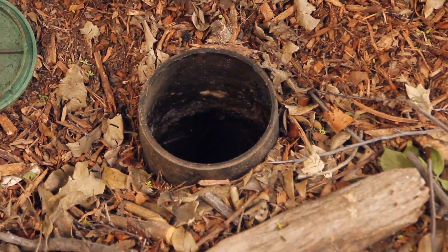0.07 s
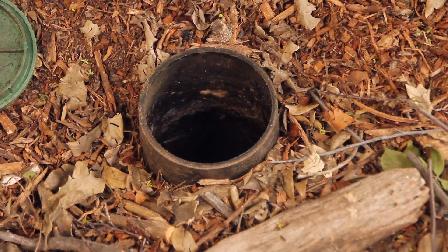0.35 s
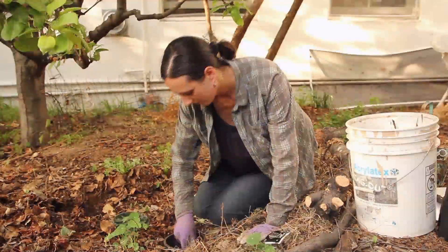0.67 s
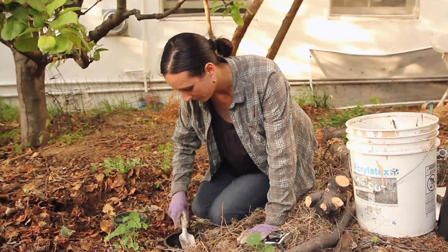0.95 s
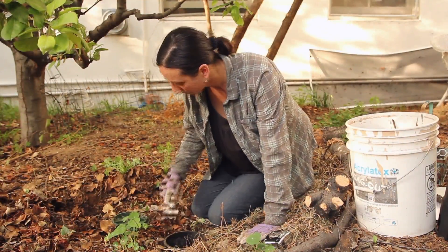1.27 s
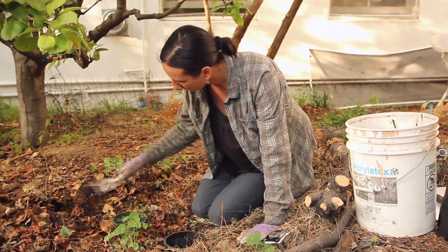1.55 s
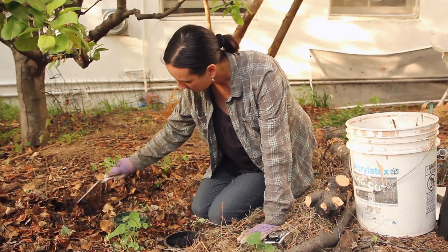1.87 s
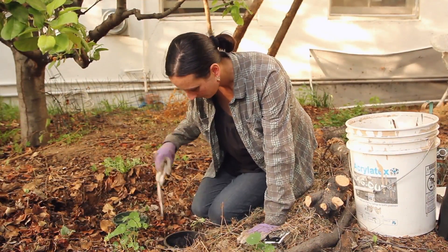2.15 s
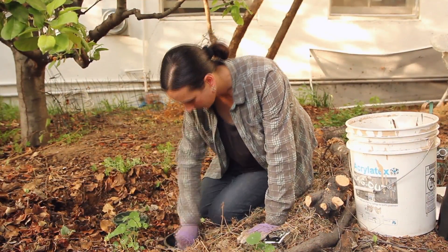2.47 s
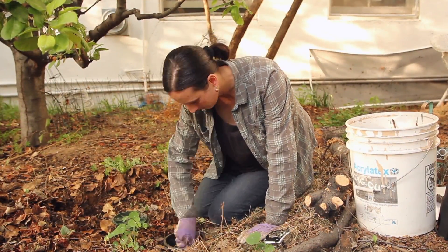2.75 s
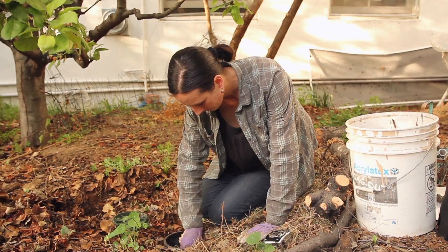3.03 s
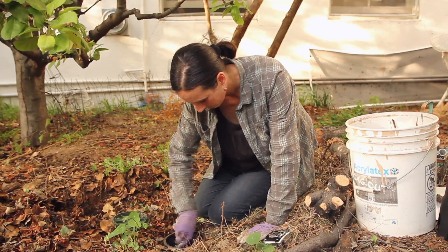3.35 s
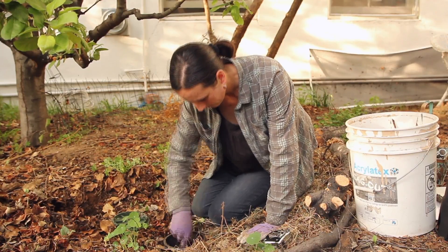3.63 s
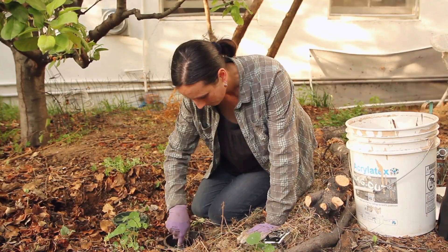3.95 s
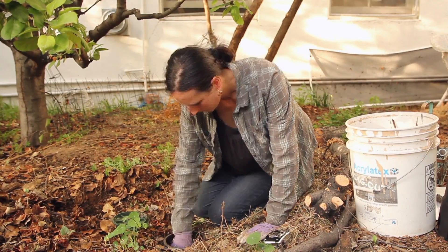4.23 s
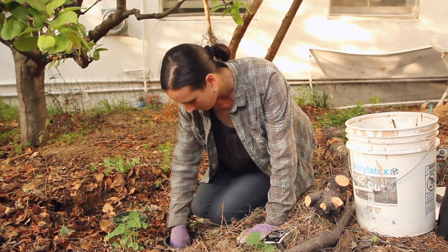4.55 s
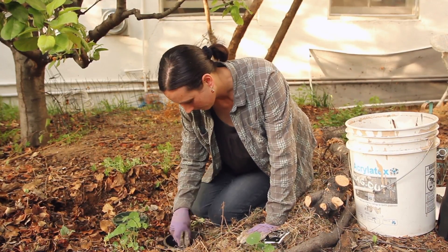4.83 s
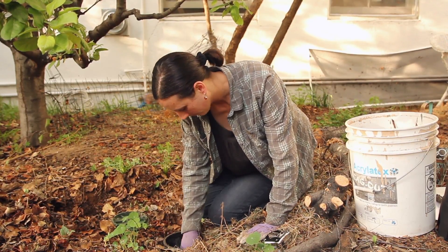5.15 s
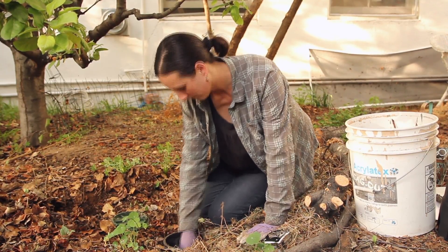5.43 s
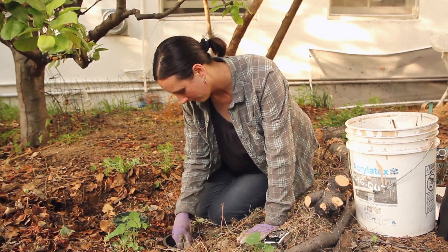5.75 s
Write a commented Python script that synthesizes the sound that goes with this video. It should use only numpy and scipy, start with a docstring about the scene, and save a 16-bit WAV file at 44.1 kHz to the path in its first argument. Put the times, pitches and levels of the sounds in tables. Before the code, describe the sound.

Quiet garden work is heard close and dry over a low electrical hum and the rumble of distant streets, both slightly louder in the first second. From the start to about 0.7 seconds, soil trickles into a sunken pot with soft thuds while wood chips rustle and snap. At 0.8 seconds a small trowel scrapes through grit, clinking at about 1 second. A quieter stretch follows with a few ticks and one sharp chip snap near 2.3 seconds. From 2.4 seconds a gloved hand rustles through the mulch in short strokes, with light scrapes and low bumps around 3 to 3.3 seconds. At about 3.7 seconds the trowel strikes the pot with a clinking knock, the loudest sound. Soft rustles and small snaps continue until nearly 6 seconds, with a soft thud at 5.3. A far songbird chirps very faintly on and off from about 1 second.

```python
"""Filling a pot in a mulch bed

Close to the microphone a gardener fills a sunken pot: soil trickles in, grit scrapes and knocks
on a small trowel's ringing blade, and a gloved hand rustles through wood chips that tick and snap.
Behind are a mains hum, the rumble and engines of distant streets, and a faint, far songbird."""
import sys
import numpy as np
from scipy import signal
from scipy.fft import rfft, irfft
from scipy.io import wavfile

SR = 44100
rng = np.random.default_rng(int(sys.argv[2]) if len(sys.argv) > 2 else 0)


def wrap_up_sound(samples):
    """Save the sound to the file named by the first command line argument, as 16-bit audio."""
    columns = np.atleast_2d(samples).T
    # keep every value between -1 and 1, then stretch to whole-number steps
    tamed = np.clip(columns, -1, 1)
    steps = np.round(tamed * 32767).astype(np.int16)
    wavfile.write(sys.argv[1], SR, steps)


N = 260013
TIME = np.arange(N) / SR


def from_db(db):
    return 10 ** (np.asarray(db) / 20)


def rms_one(x):
    return x / np.sqrt(np.mean(x ** 2) + 1e-20)


def peak_one(x):
    return x / np.abs(x).max()


def level(rows):
    """Gain over time from rows of time_s, level_db."""
    return from_db(np.interp(TIME, *np.transpose(rows)))


def colour(x, spectrum):
    """Shape a steady sound by rows of frequency_hz, relative_db; rms 1."""
    hz, db = np.transpose(spectrum)
    bins_hz = np.fft.rfftfreq(N, 1 / SR)
    gain = from_db(np.interp(np.log(bins_hz + 1), np.log(hz), db))
    return rms_one(irfft(rfft(x) * gain, N))


def add(out, start_s, sound):
    """Mix a short sound in at a time."""
    at = max(int(start_s * SR), 0)
    out[at:at + len(sound)] += sound[:max(N - at, 0)]


def band(x, low_hz, high_hz):
    """Gentle band limit."""
    return signal.sosfilt(signal.butter(2, [low_hz, high_hz], "band", fs=SR, output="sos"), x)


def resonate(x, hz, width_hz):
    """Two-pole resonance with gain 1 at its peak."""
    r = np.exp(-np.pi * width_hz / SR)
    feedback = [1, -2 * r * np.cos(2 * np.pi * hz / SR), r * r]
    return signal.lfilter(np.array([1, 0, -1]) * (1 - r * r) / 2, feedback, x + 1e-18)


def dying(t60_s, size=6000):
    """Envelope that falls 60 dB in t60_s."""
    return np.exp(-np.log(1000) * TIME[:size] / t60_s)


def burst(t60_s, size=6000):
    """Noise that dies away."""
    return dying(t60_s, size) * rng.standard_normal(size)


def ringing(hz, t60_s, size=6000):
    """One struck mode."""
    return dying(t60_s, size) * np.sin(2 * np.pi * hz * TIME[:size])


def unsteady(per_s):
    """Random wobble of rms 1 that turns per_s times a second."""
    return rms_one(np.interp(TIME * per_s, np.arange(8000), rng.standard_normal(8000)))


def grains(per_s, spread_db):
    """Random tiny contacts: many weak, a few strong."""
    sizes = from_db(spread_db * np.minimum(rng.exponential(1, N), 4))
    return rms_one(sizes * rng.choice([-1, 1], N) * (rng.random(N) < per_s / SR))


def crumbs(per_s, spread_db):
    """Crumbs of eight sizes: each size cracks on its own, in its own range of pitch."""
    edges_hz = np.r_[100, np.geomspace(1200, 16000, 8)]
    ranges = zip(edges_hz, edges_hz[1:])
    return rms_one(sum(band(grains(per_s, spread_db), low, high) for low, high in ranges))


# Distant streets, as loud as they reach the garden: time_s, level_db
STREET_LOUDNESS = [(0, -50), (.85, -49), (1.15, -53), (5.9, -53.5)]
# Their rumble at the microphone: frequency_hz, relative_db
STREET_SPECTRUM = [(22, -29), (35, -27.5), (55, -0.5), (85, 2.5), (150, -5.5), (220, -8), (330, -16),
                   (460, -20), (720, -16), (980, -17.5), (1300, -27), (1900, -32.5), (2700, -43.5),
                   (5000, -53.5)]
def streets():
    """Far streets blur into one low rumble."""
    return level(STREET_LOUDNESS) * colour(rng.standard_normal(N), STREET_SPECTRUM)


# Engines passing in those streets: start_s, end_s, start_hz, end_hz, level_db
ENGINE_PASSES = [(-.6, 1.16, 90.3, 88.75, -53), (4.9, 6.6, 102, 92.5, -54)]
def engines():
    """Each far engine swells and fades while its firing note sinks."""
    out = np.zeros(N)
    for start, end, first_hz, last_hz, db in ENGINE_PASSES:
        progress = np.clip((TIME - start) / (end - start), 0, 1)
        hz = first_hz + (last_hz - first_hz) * progress
        swell = from_db(db) * np.sin(np.pi * progress)
        out += swell * np.sqrt(2) * np.sin(2 * np.pi * np.cumsum(hz) / SR)
    return out


# Hum behind the mulch bed: time_s, level_db
HUM_LOUDNESS = [(0, -46.5), (.8, -46.5), (1.15, -51), (3.6, -50), (4.25, -48), (4.85, -51.3), (5.9, -50.5)]
def mains_hum(pitch_hz=119.9, waver_db=2.43):
    """A tone at twice the mains rate, wavering slightly in level."""
    gain = level(HUM_LOUDNESS) * from_db(waver_db * unsteady(per_s=8))
    return gain * np.sqrt(2) * np.sin(2 * np.pi * (pitch_hz * TIME + rng.random()))


def microphone_hiss(level_db=-75.5):
    """The microphone's own white noise."""
    return from_db(level_db) * rng.standard_normal(N)


# Glove strokes through the bed, close by: start_s, end_s, end_level_db
GLOVE_STROKES = [(-.1, 0.088, -64.5), (0.225, 0.493, -62.5), (0.544, 0.722, -62), (0.75, 1.09, -63),
                 (1.45, 1.93, -84), (2.41, 2.616, -65.5), (2.715, 2.862, -74), (3.068, 3.08, -65),
                 (3.224, 3.31, -65.5), (3.515, 3.55, -67), (3.74, 3.856, -70), (4.218, 4.302, -66.5),
                 (4.467, 4.81, -69.5), (5.09, 5.443, -67.5), (5.545, 5.727, -66.5)]
# The mulch's rustle at the microphone: frequency_hz, relative_db
MULCH_SPECTRUM = [(150, 17), (300, 2), (700, 15), (1400, 0.5), (2400, 4.5), (3200, -3.5), (5000, 0),
                  (7500, -3.5), (11000, -4.5), (16000, -9)]
def glove_rustle(attack_s=0.0089, swell_db=3, settle_t60_s=0.44, clump_db=2.5):
    """Mulch gives way in clumps as the hand presses harder through each stroke, then settles."""
    pressure = np.zeros(N)
    for start, end, db in GLOVE_STROKES:
        to_go = np.clip((end - TIME) / (end - start), 0, 1)
        onset = np.clip((TIME - start) / attack_s, 0, 1)
        settling = np.exp(-np.log(1000) * np.maximum(TIME - end, 0) / settle_t60_s)
        pressure = np.maximum(pressure, from_db(db - swell_db * to_go) * onset * settling)
    crunch = crumbs(per_s=1800, spread_db=3.8) * from_db(clump_db * unsteady(per_s=110))
    return pressure * colour(crunch, MULCH_SPECTRUM)


# Lumps of soil running into the pot, close by: peak_s, level_db, t60_s
SOIL_LUMPS = [(0.279, -52, 0.14), (.335, -62, 0.19), (.615, -64, 0.15), (.70, -72, 0.24)]
# The trickle at the microphone: frequency_hz, relative_db
SOIL_SPECTRUM = [(900, 0.5), (2300, 1), (3500, -11), (5500, -2), (7500, 9), (10000, -2.5), (14000, 0),
                 (16000, -13)]
def soil_trickle(rise_s=0.049, dribble_db=-76, dribble_end_s=0.32):
    """Lumps slide in quickly and trickle out; fine soil dribbles off the blade until it is empty."""
    flow = from_db(dribble_db) * np.clip((dribble_end_s - TIME) / rise_s, 0, 1)
    for peak_s, db, t60 in SOIL_LUMPS:
        below_peak_db = 60 * np.maximum((peak_s - TIME) / rise_s, (TIME - peak_s) / t60)
        flow += from_db(db - below_peak_db)
    return flow * colour(crumbs(per_s=2500, spread_db=3.8), SOIL_SPECTRUM)


# Wood chips snapping near the microphone: start_s, peak_db, pitch_hz, t60_s
CHIP_SNAPS = [(.019, -41.5, 2970, 0.0059), (.107, -54, 2500, .012), (.2296, -52, 4270, 0.011),
              (0.3315, -50.5, 4240, .012), (0.3889, -39.5, 6200, .008), (.455, -50, 2370, 0.013),
              (.588, -50, 6360, .0094), (.6132, -54, 6400, .018), (.704, -52, 5470, 0.017),
              (1.4965, -53, 9500, 0.023), (1.822, -60.5, 8450, 0.022), (1.919, -57, 1780, 0.03),
              (2.259, -39.5, 5700, 0.011), (2.8346, -51.5, 5940, 0.0067), (3.084, -56.5, 4840, 0.043),
              (3.1305, -54, 5050, .01), (3.3734, -56.5, 3300, .0074), (3.539, -49.5, 10000, .031),
              (4.234, -59, 4430, .019), (4.2826, -57, 8100, .016), (4.506, -56, 12500, .008),
              (4.823, -55.5, 5800, 0.018), (5.164, -51.5, 4830, 0.0047), (5.304, -60, 4030, 0.012),
              (5.711, -51, 4950, 0.021), (5.733, -52.5, 10100, 0.027)]
def chip_snaps(damping=0.3, crack_db=-7):
    """Each chip gives way in a quick burst of fibre cracks, coloured by its own broad resonance."""
    out = np.zeros(N)
    for start, peak_db, hz, t60 in CHIP_SNAPS:
        crack = band(burst(t60), low_hz=0.17 * hz, high_hz=1.27 * hz + 800)
        tick = resonate(crack, hz, damping * hz) + from_db(crack_db) * crack
        add(out, start, from_db(peak_db) * peak_one(tick))
    return out


# Modes of the trowel's blade in free air: pitch_hz, width_hz, relative_db
BLADE_MODES = [(2210, 110, -24), (2344, 150, 10), (2616, 210, -1), (3680, 1050, 2), (3790, 69, -9),
               (4380, 190, -4.5), (5480, 200, 2.5), (5750, 180, -10), (6440, 200, -22), (7520, 240, -2),
               (8800, 130, -9), (10060, 300, -1.5), (10630, 99, -20), (11760, 76, -8), (12700, 110, -9)]
def blade(force, damping, grit_db=-30):
    """The blade's modes, widened where soil presses on it, plus the bare crunch of the grit."""
    modes = sum(from_db(db) * resonate(force, hz, width * damping) for hz, width, db in BLADE_MODES)
    return modes + from_db(grit_db) * band(force, low_hz=1600, high_hz=13100)


def rub(grit, pressure, depth):
    """From tip (depth 0) to buried (1), the blade is damped more and the grit drives it lower."""
    damping = np.interp(depth, [0, 1], [0.62, 1.3])
    tip_hz, buried_hz = 5200, 790
    low_hz = tip_hz * (buried_hz / tip_hz) ** depth
    slips = signal.sosfilt(signal.butter(1, low_hz, "high", fs=SR, output="sos"), grit[:len(pressure)])
    force = np.pad(slips * pressure, (0, 1000))   # room to ring out
    return blade(force, damping) / np.std(blade(slips, damping))


# The trowel sliding through grit, close by: start_s, end_s, level_db, build_fraction, depth_fraction
TROWEL_SLIDES = [(0.803, 0.951, -51.5, 0.77, 1), (0.96, 1.08, -55.5, 0.19, 0.8),
                 (2.655, 2.832, -76, 0.41, .05), (3.21, 3.305, -67.5, 0.5, 0),
                 (3.607, 3.678, -62.5, 0.76, 0)]
# Brief gritty scrapes of soil on the ringing blade: start_s, length_s, level_db, depth_fraction
BLADE_CATCHES = [(0.225, .005, -57, 0.6), (0.603, 0.014, -60, 1), (0.682, 0.026, -62.5, 1),
                 (2.825, 0.0197, -63, 0), (3.307, 0.0067, -49, 0), (3.687, 0.0043, -46, 0.5)]
def trowel_scrapes(judder_db=2.0, swell_db=20, release_s=0.012):
    """Grit catches on the blade thousands of times a second, in swelling slides and brief scrapes."""
    out = np.zeros(N)
    grit = crumbs(per_s=1800, spread_db=3.6) * from_db(judder_db * unsteady(per_s=220))
    for start, end, db, build, depth in TROWEL_SLIDES:
        length = end - start
        t = TIME[:int((length + release_s) * SR)]
        swell = from_db(db - swell_db * np.clip(1 - t / (build * length), 0, 1))
        release = np.clip(1 - (t - length) / release_s, 0, 1)
        add(out, start, rub(grit[int(start * SR):], swell * release, depth))
    for start, length, db, depth in BLADE_CATCHES:
        pressure = np.full(int(length * SR) + 1, from_db(db))
        add(out, start, rub(grit[int(start * SR):], pressure, depth))
    return out


# Soft low thuds in the pot, close by, of soil landing and later light bumps: start_s, peak_db
POT_THUDS = [(0.275, -49), (.336, -58), (0.61, -45), (0.704, -46.5), (3.03, -47), (3.309, -42.5),
             (3.687, -40.5), (4.288, -66), (5.299, -47)]
def pot_thuds(t60_s=0.092):
    """Landing soil and light bumps shake only the lowest range of the buried pot."""
    out = np.zeros(N)
    for start, peak_db in POT_THUDS:
        thud = band(burst(t60_s), low_hz=160, high_hz=290)
        add(out, start, from_db(peak_db) * peak_one(thud))
    return out


# Modes of the buried pot and the packed ground around it: pitch_hz, t60_s, relative_db
POT_MODES = [(202, 0.044, -3), (320, 0.027, 3), (452, 0.0048, -19), (572, 0.24, -28.5), (690, 0.0092, 3.5),
             (861, 0.05, 0), (950, 0.025, -24), (1210, 0.018, -13), (1457, 0.076, -28), (1960, 0.034, -8),
             (2085, 0.013, -9), (2505, 0.072, -11)]
# Trowel blows near the microphone: start_s, blade_db, knock_db, crunch_t60_s
TROWEL_BLOWS = [(.9868, -30, -44, 0.0085), (3.688, -49, -44, 0.014), (3.7325, -30, -17.5, 0.016),
                (3.7343, -24.5, -15.5, 0.017), (3.7385, -40.5, -41, 0.082)]
def trowel_strikes(edge_hz=5630, edge_t60_s=0.014, edge_db=-11, cushion_hz=10000):
    """A blow crunches grit against the blade, pings its edge and thumps the buried pot."""
    out = np.zeros(N)
    knock = sum(from_db(db) * ringing(hz, t60) * (-1) ** k for k, (hz, t60, db) in enumerate(POT_MODES))
    ping = from_db(edge_db) * ringing(edge_hz, edge_t60_s)
    cushion = signal.butter(1, cushion_hz, fs=SR, output="sos")   # soil takes off the very top
    for start, blade_db, knock_db, t60 in TROWEL_BLOWS:
        force = signal.sosfilt(cushion, burst(t60))
        clink = peak_one(blade(force, damping=1.8, grit_db=-6)) + ping
        add(out, start, from_db(blade_db) * clink + from_db(knock_db) * peak_one(knock))
    return out


# A songbird far from the microphone: start_s, start_hz, level_db
BIRD_NOTES = [(1.14, 8000, -79), (1.32, 7200, -80.5), (2.131, 6900, -79), (2.62, 5050, -77.5),
              (2.68, 3730, -72.5), (3.189, 6830, -75.5), (3.32, 7000, -73.5), (3.43, 7170, -72.5),
              (3.601, 7360, -73), (3.836, 5300, -70.5), (3.89, 4250, -73), (4.315, 3520, -73.5),
              (4.635, 6970, -75.5), (5.61, 5820, -76)]
def songbird(note_s=0.085, fall_hz=1193, rasp=0.072, yard_t60_s=0.49):
    """Raspy falling notes, smeared by the walls and leaves they cross on the way."""
    out, size = np.zeros(N), int(note_s * SR)
    for start, first_hz, db in BIRD_NOTES:
        glide_hz = np.linspace(first_hz, first_hz - fall_hz, size)
        hz = glide_hz * (1 + rasp * unsteady(per_s=530)[:size])
        tone = np.sqrt(2) * np.sin(2 * np.pi * np.cumsum(hz) / SR)
        add(out, start, from_db(db) * signal.windows.tukey(size) * tone)
    echoes = burst(yard_t60_s, size=24000)
    return signal.fftconvolve(out, echoes / np.linalg.norm(echoes))[:N]


def scene():
    """One microphone at the bed: close, dry garden work over the outdoor background."""
    background = streets() + engines() + mains_hum() + microphone_hiss()
    potting = soil_trickle() + glove_rustle() + trowel_scrapes() + trowel_strikes() + pot_thuds()
    return (background + potting + songbird() + chip_snaps())[None]


def record(dry):
    """The top is cut steeply."""
    cutoff_hz = 15750
    return signal.sosfilt(signal.ellip(12, .1, 80, cutoff_hz, fs=SR, output="sos"), dry)


dry = scene()
out = record(dry)
wrap_up_sound(out)
```